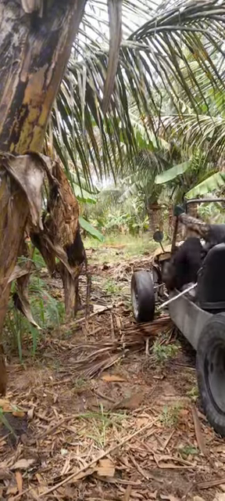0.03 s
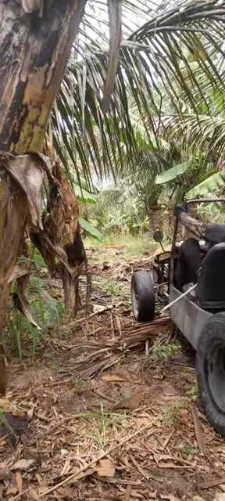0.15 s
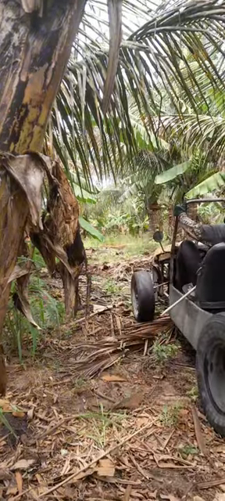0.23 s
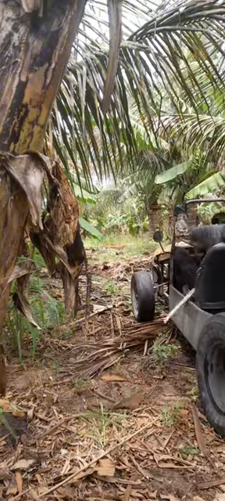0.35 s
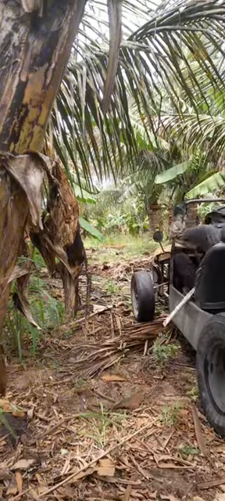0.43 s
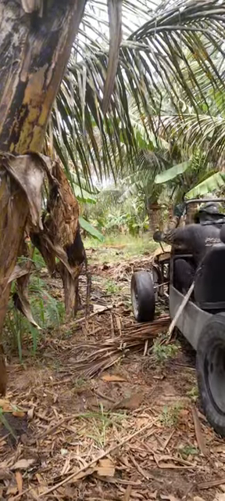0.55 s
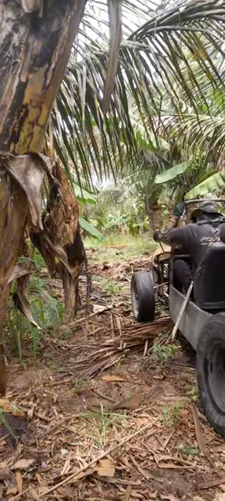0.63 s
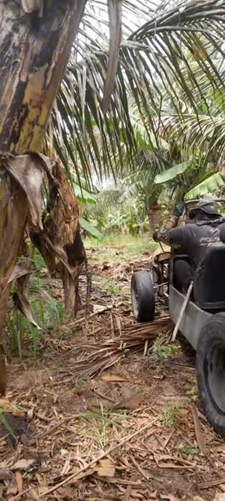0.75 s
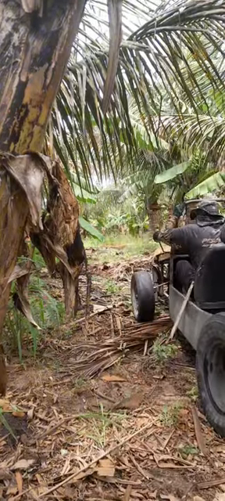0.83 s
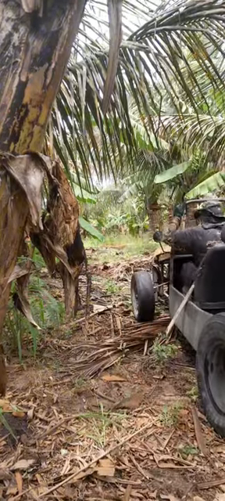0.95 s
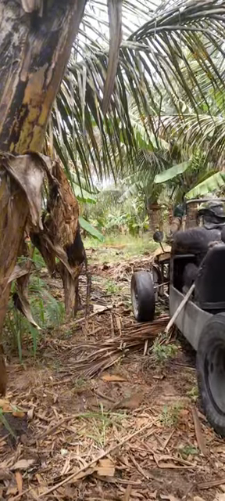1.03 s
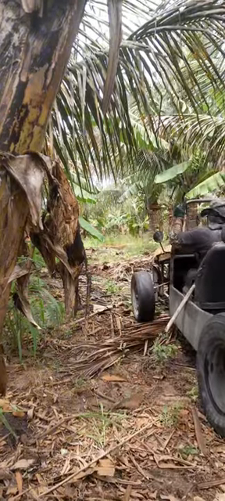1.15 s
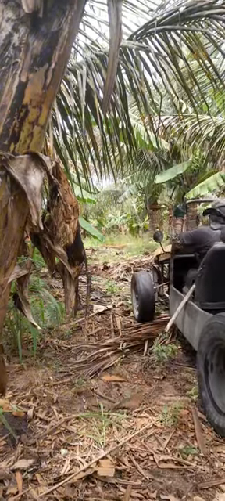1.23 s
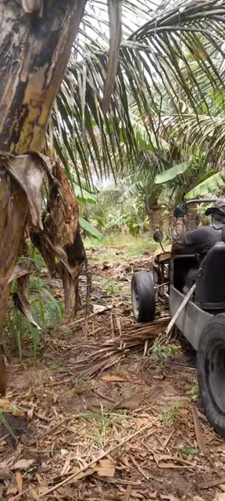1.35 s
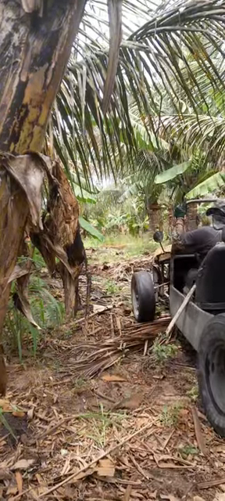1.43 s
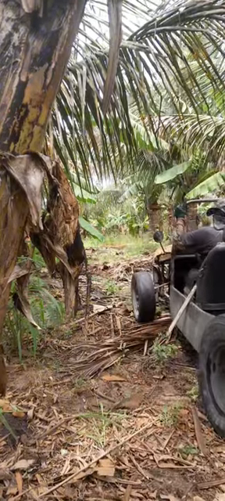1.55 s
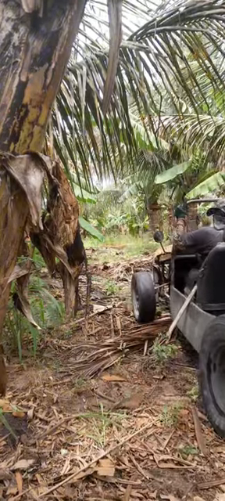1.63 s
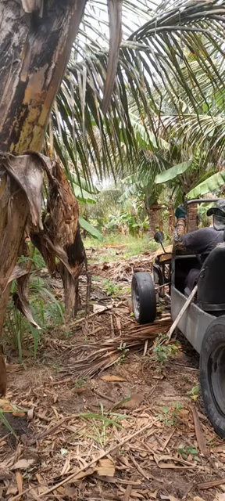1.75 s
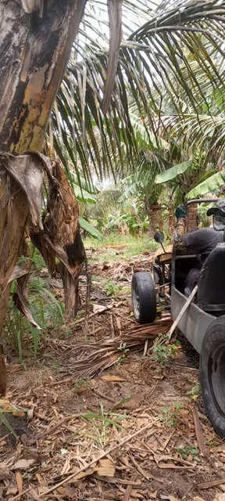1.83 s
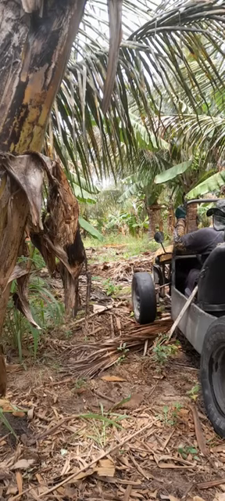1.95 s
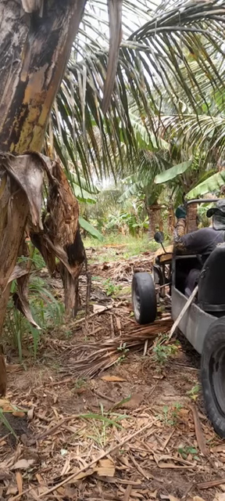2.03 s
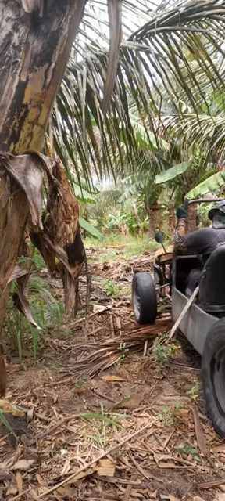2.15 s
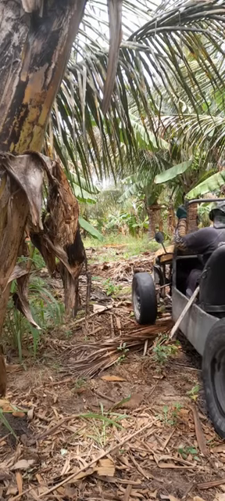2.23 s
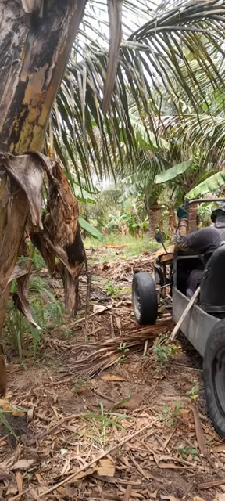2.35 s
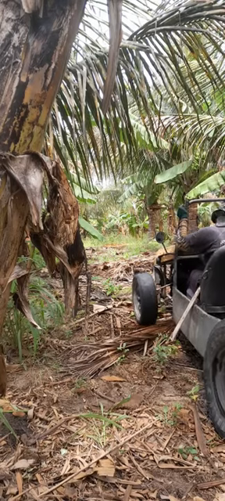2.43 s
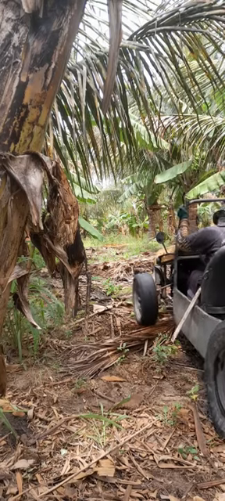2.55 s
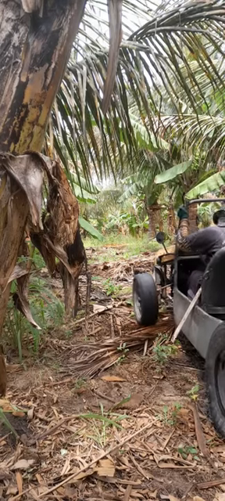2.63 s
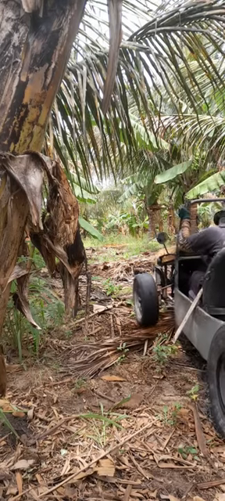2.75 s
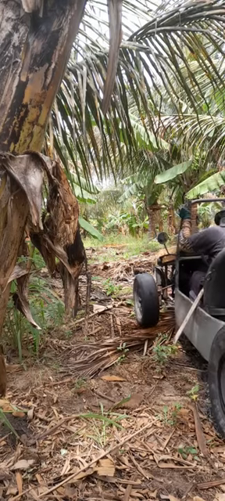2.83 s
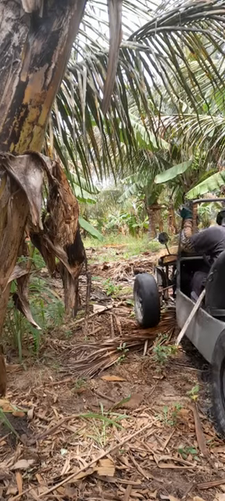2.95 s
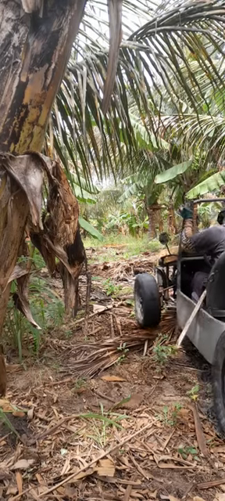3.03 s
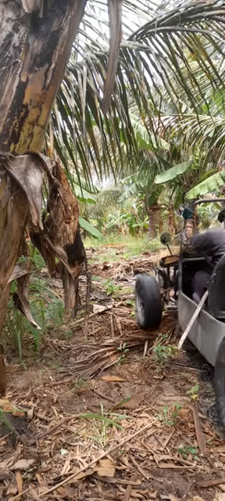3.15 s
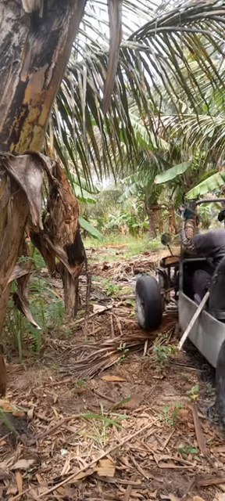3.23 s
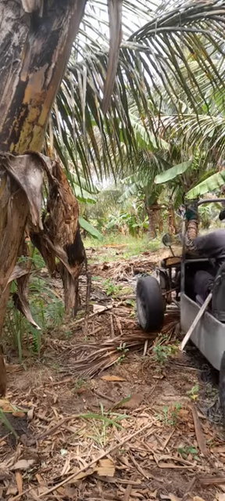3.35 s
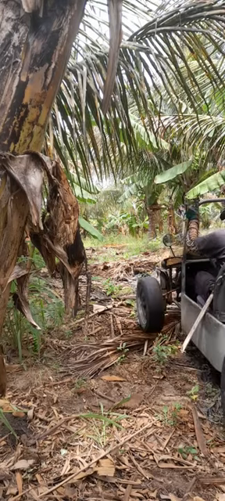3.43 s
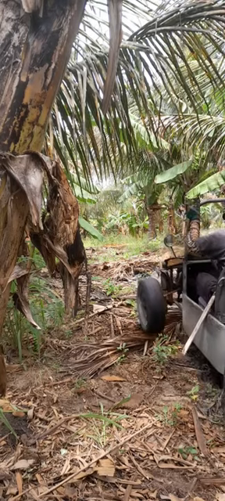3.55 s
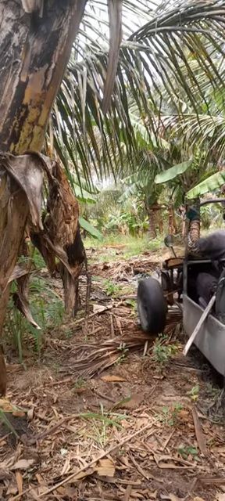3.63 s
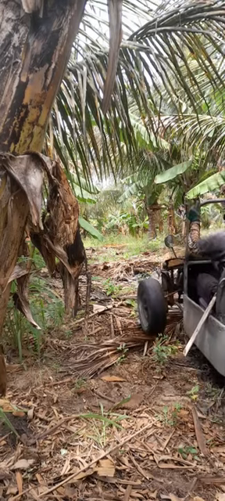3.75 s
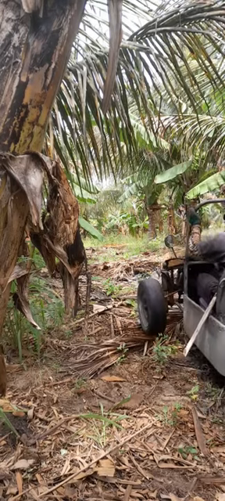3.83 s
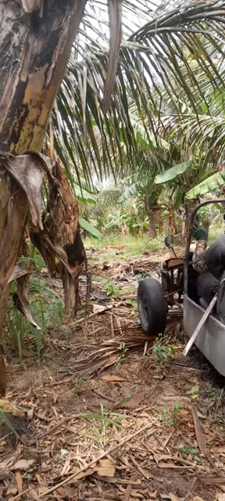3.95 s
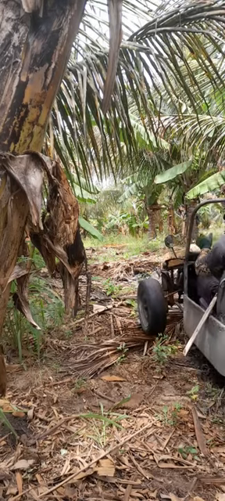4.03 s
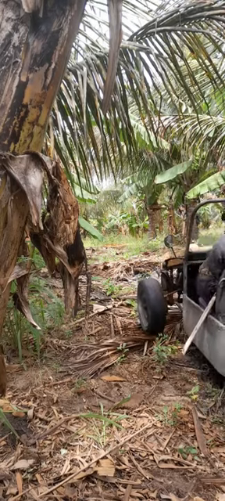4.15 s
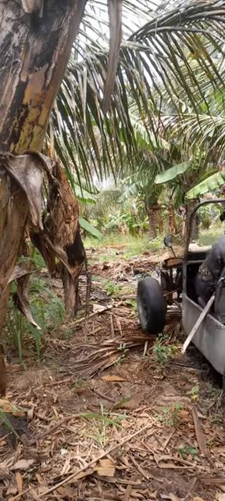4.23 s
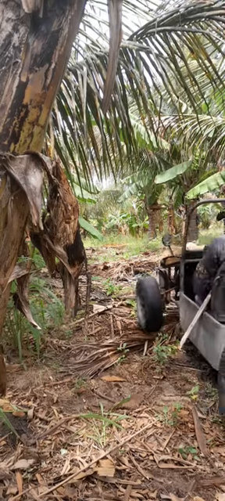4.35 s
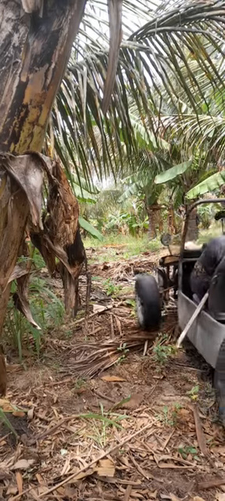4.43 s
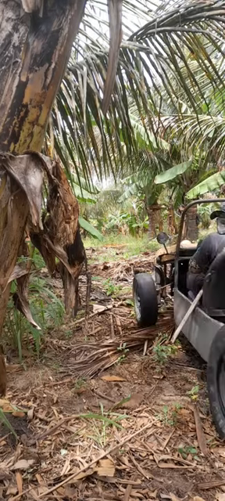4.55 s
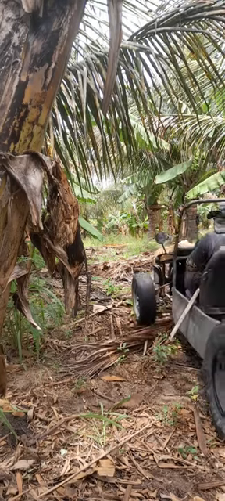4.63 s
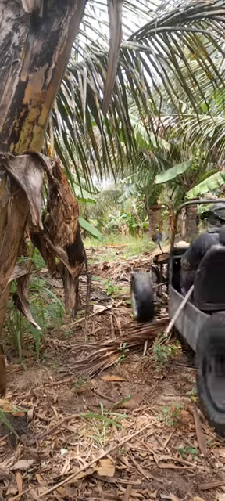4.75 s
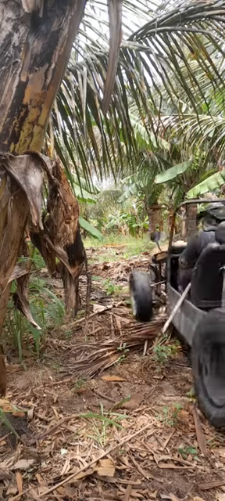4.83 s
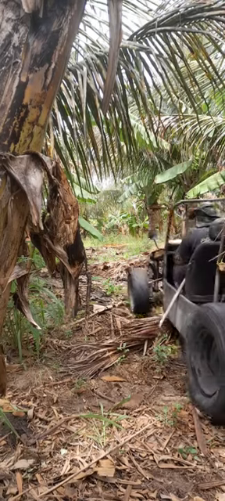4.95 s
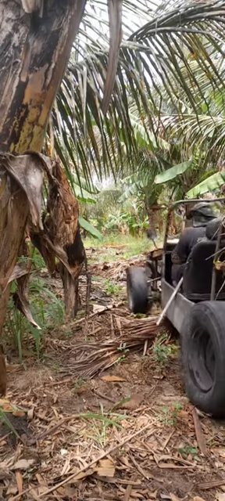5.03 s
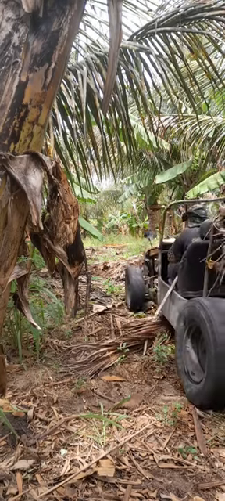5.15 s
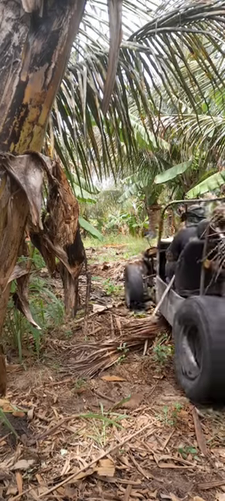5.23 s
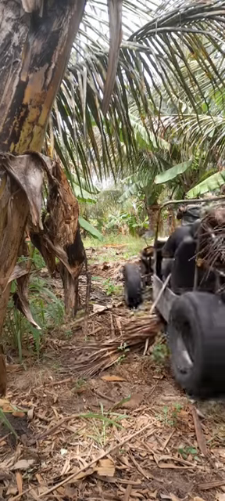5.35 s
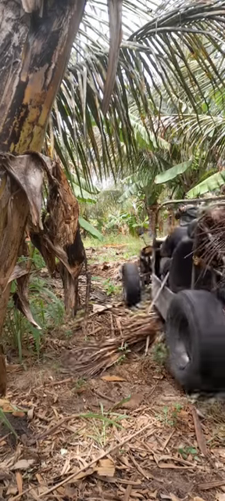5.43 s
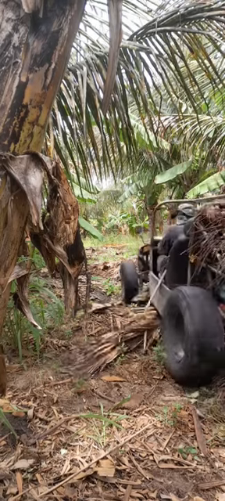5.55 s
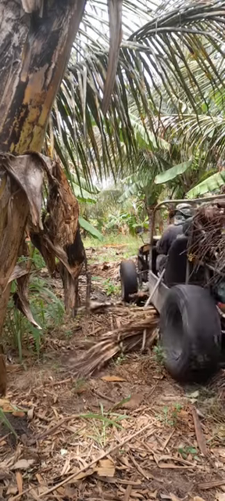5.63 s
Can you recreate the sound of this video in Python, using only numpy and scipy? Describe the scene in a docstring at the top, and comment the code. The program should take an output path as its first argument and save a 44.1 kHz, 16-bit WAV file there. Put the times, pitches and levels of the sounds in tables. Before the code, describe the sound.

The sound opens on quiet open air in a palm grove, with insects and a motor droning far off. Dry leaves crackle faintly during the first second and a half. Close to the microphone, a small buggy gives a few soft, hollow knocks around 0.5 seconds. At about 1.2 seconds its starter engages with metallic clunks and grinds louder, squealing briefly near 1.6 seconds. From 1.8 to 2.6 seconds the engine coughs in three bursts, then catches with a quick rise in speed. It sags, with one backfire pop at about 3 seconds, and stumbles near 3.5. A longer rev builds from 3.8 seconds and peaks around 4.2, full of thumping exhaust, sharp cracks and tinny rattle. The engine then slows, dropping to a lumpy idle from about 5 seconds until the end, just before 6 seconds.

```python
"""Dry leaves rustle in the open air of a palm grove, with insects and a motor far off. Close to the
microphone a small four-cylinder buggy knocks, then its starter clunks in and grinds. The engine coughs
in three bursts, catches, sags with one backfire, revs and drops to a lumpy idle. Each firing is a crack
of gas, a low thump and a ring that rises as the piston shrinks the cylinder."""
import sys
import numpy as np
from scipy import signal
from scipy.fft import rfft, irfft
from scipy.io import wavfile

SR = 44100
rng = np.random.default_rng(int(sys.argv[2]) if len(sys.argv) > 2 else 0)


def log_audio(samples):
    """Write samples as a 16-bit WAV file to the path given in sys.argv[1]."""
    # one column per channel
    frames = np.atleast_2d(samples).T
    # limit to full scale, then quantise
    limited = np.clip(frames, -1, 1)
    pcm = np.round(limited * 32767).astype(np.int16)
    wavfile.write(sys.argv[1], SR, pcm)


N = 251370
T = np.arange(N) / SR


def amp(db):
    """Decibels to amplitude."""
    return 10 ** (np.asarray(db) / 20)


def colour(x, points):
    """Filter by a spectrum of (f/Hz, gain/dB) points."""
    hz, db = np.transpose(points)
    f = np.maximum(np.fft.rfftfreq(N, 1 / SR), 1)
    return irfft(rfft(x) * amp(np.interp(np.log(f), np.log(hz), db)), N)


def noise(points, alike):
    """Coloured stereo noise at rms 1; alike is the share of power common to both channels."""
    white = np.sqrt(alike) * rng.standard_normal(N) + np.sqrt(1 - alike) * rng.standard_normal((2, N))
    coloured = colour(white, points)
    return coloured / np.sqrt(np.mean(coloured ** 2))


def walk(rate):
    """Random wander through rate points a second, spread near 1."""
    count = int(N / SR * rate) + 2
    return 1.04 * np.interp(T * rate, np.arange(count), rng.standard_normal(count))


def add(track, start, sound):
    """Mix a sound in at start seconds."""
    i = int(np.clip(start * SR, 0, N))
    track[i:i + len(sound)] += sound[:N - i]


def bursts(times, dbs, rise, decay, tail_db, tail):
    """Envelope of bursts that swell, die fast and leave a weak scatter from ground and trunks."""
    power, age = np.zeros(N), T[:SR // 3]
    swell, after = np.minimum(age / rise, 1) ** 2, np.maximum(age - rise, 0)
    scatter = amp(tail_db) ** 2 * np.exp(-2 * after / tail)
    for start, db, fade in zip(times, dbs, np.broadcast_to(decay, len(times))):
        add(power, start, amp(db) ** 2 * swell * (np.exp(-2 * after / fade) + scatter))
    return np.sqrt(power)


def resonate(x, modes):
    """Let a sound excite (f/Hz, width/Hz, gain/dB) resonances."""
    f = np.fft.rfftfreq(N, 1 / SR)
    return irfft(rfft(x) * sum(amp(db) / (1 + 2j * (f - hz) / width) for hz, width, db in modes), N)


# open air all round the microphone (f/Hz, gain/dB)
AIR_COLOUR = [(21, -37), (35, -14), (65, -15.5), (86, -10.5), (180, -8.5), (210, -10.5), (294, -13),
              (602, -15.5), (739, -10.5), (930, -15), (1480, -20.5), (2400, -24), (3350, -18),
              (5050, -34.5), (16000, -47)]
# a motor far off (f/Hz, level/dB)
MOTOR_HUM = [(59.2, -49.5), (118.4, -53.5)]
# machinery and insects in the distance (f/Hz, width/Hz, level/dB)
DRONES = [(289, 39, -56), (777, 80, -54.5), (3460, 50, -60.5), (3640, 140, -65.5), (4000, 60, -64)]
def grove(air_db=-48):
    """Steady air under the palms, with a wavering hum and narrow bands of drone."""
    air = amp(air_db) * noise(AIR_COLOUR, alike=0.65) * amp(0.13 * walk(14.6))
    hum = sum(amp(db + 2.2 * walk(5.2)) * np.sqrt(2) * np.sin(2 * np.pi * hz * T + 0.57 * walk(16))
              for hz, db in MOTOR_HUM)
    drones = sum(amp(db) * np.real((walk(width) + 1j * walk(width)) * np.exp(2j * np.pi * hz * T))
                 for hz, width, db in DRONES)
    return air + hum + drones


# the loudest crackles on the grove floor (t/s, relative level/dB)
CRACKLES = [(.076, -51), (0.186, -45), (.23, -49), (.608, -49), (1.067, -49), (1.111, -45.5),
            (1.225, -45.5)]
# dry leaves, spread wide across the microphone (f/Hz, gain/dB)
LEAF_COLOUR = [(1180, -46), (2000, -10), (2300, -4.5), (3550, -1), (8780, -12.5), (13100, -4.5),
               (16000, -13)]
def leaves(spells_s=((0, 0.31), (0.881, 1.4)), per_spell=4):
    """Leaf litter crackles: a few loud ones, and faint ones scattered through two spells."""
    faint = [(start + (end - start) * (k + rng.random()) / per_spell, -53 + rng.standard_normal())
             for start, end in spells_s for k in range(per_spell)]
    when, db = np.transpose(list(CRACKLES) + faint)
    rustle = bursts(when, db, rise=0.0013, decay=0.0085, tail_db=-2, tail=0.037)
    return noise(LEAF_COLOUR, alike=0.056) * rustle * amp(4.5 + 2.4 * walk(700))


# the buggy's frame, close by and centred (t/s, f/Hz, level/dB, length/s)
FRAME_BOOMS = [(.16, 108, -39, 0.1), (0.452, 230, -38, 0.052), (0.531, 229, -42, 0.072),
               (1.169, 118, -34.5, 0.058)]
def booms(crank_start_s=1.235, crank_period_s=.132):
    """The frame booms hollowly, and so do the starter's first four slow compression strokes."""
    compressions = [(crank_start_s + k * crank_period_s, 98, -32, .085) for k in range(4)]
    return sum(amp(db) * np.sin(2 * np.pi * hz * (T - start))
               * np.sin(np.pi * np.clip((T - start) / length, 0, 1))
               for start, hz, db, length in list(FRAME_BOOMS) + compressions)


# controls, starter and frame at close range (t/s, relative body/dB, snap/dB, body decay/s)
KNOCKS = [(0.438, -34.5, -44, 0.021), (.51, -43.5, -50, 0.017), (1.238, -28.5, -36.5, 0.029),
          (1.324, -51.5, -31, 0.0066), (1.341, -29.5, -22, 0.018), (1.364, -26.5, -52, 0.053),
          (1.438, -44, -32, 0.035), (1.701, -26, -28, 0.054), (1.74, -46, -36, 0.083),
          (1.826, -39, -32, 0.067)]
# a knock's body, near centre (f/Hz, gain/dB)
BODY_COLOUR = [(110, -5), (180, 4.5), (259, -11.5), (507, -6.5), (903, -6), (1160, -8), (1410, -17),
               (1570, -28), (2700, -32), (3000, -12), (3900, -45), (6600, -120)]
# its metallic snap, spread wider (f/Hz, gain/dB)
SNAP_COLOUR = [(470, -30), (800, -11), (1440, -7), (2050, -4), (2840, -8.5), (3740, -5.5), (8550, -29.5),
               (14800, -22.5), (16000, -30)]
# resonances of the starter housing and frame (f/Hz, width/Hz, gain/dB)
HOUSING_MODES = [(376, 20, 4.5), (456, 30, -4.5), (529, 36, 0.5), (707, 26, -6)]
def knocks():
    """Each knock is a metallic snap and a rattling body that rings the housing."""
    when, body_db, snap_db, decay = np.transpose(KNOCKS)
    body = noise(BODY_COLOUR, alike=0.97)
    body *= bursts(when, body_db, rise=0.0088, decay=decay, tail_db=-12, tail=0.15)
    snap = noise(SNAP_COLOUR, alike=.2)
    snap *= bursts(when, snap_db, rise=0.0019, decay=1.1 * decay, tail_db=-15.5, tail=0.12)
    return amp(-3.5) * body + amp(5) * resonate(body, HOUSING_MODES) + snap * amp(0.84 * walk(400))


def clatter_level(starter_in_s=1.1, peak_s=1.77, rise_db_per_s=34.5, ease_db_per_s=10):
    """The starter grinds louder as it spins up, then eases off until the engine takes over."""
    starter_db = -34 - np.maximum(rise_db_per_s * (peak_s - T), ease_db_per_s * (T - peak_s))
    running_db = effort_db(T, shut_db=-40.5, open_adds_db=5.04, octave_db=10.1)
    engaged = np.clip((T - starter_in_s) / 0.024, 0, 1)
    return amp(np.where(T < CATCH_S, starter_db, running_db)) * engaged


# gears and tappets, heard from beside the engine (f/Hz, gain/dB)
GEAR_COLOUR = [(290, -12.5), (500, -4.5), (659, -8), (1000, -1.5), (1400, -10.5), (1600, -7.5), (1820, -14),
               (2070, -9.5), (2460, -12), (3340, -7.5), (8700, -31), (13100, -21), (16000, -30.5)]
def clatter(when):
    """Gears rasp and tappets tick twice a stroke; the block knocks near 1 kHz and rumbles faintly."""
    stroke_s = np.gradient(when)
    taps = np.r_[when + .002, when + stroke_s / 2]
    tap_db = -2 + 3 * rng.standard_normal(len(taps))
    ticks = bursts(taps, tap_db, rise=0.00067, decay=0.0018, tail_db=-32, tail=.015)
    rasp = noise(GEAR_COLOUR, alike=0.46) * (amp(-0.5 + 2 * walk(250)) + ticks)
    # the knock stands out when the engine runs slowly
    knock_db = 1 + 20 * np.log10(np.minimum(stroke_s / 0.019, 1.2)) + 3 * rng.standard_normal(len(when))
    beats = bursts(when - .002, knock_db, rise=0.0044, decay=0.0045, tail_db=-27, tail=0.021)
    knock = noise([(700, -10), (900, -1), (1020, 6), (1200, -6), (1400, -48)], alike=0.99) * beats
    rumble = noise([(40, -23), (110, -7.5), (420, -10.5), (650, -23), (1200, -61)], alike=0.91)
    return clatter_level() * (rasp + knock + amp(-0.5) * rumble)


# the starter drive, close by (harmonic number, relative level/dB)
SQUEAL_PARTIALS = [(1, -3.5), (2, -12), (3, -7), (4, 2.5), (5, -15)]
def squeal(start_s=1.612, length_s=0.059, hz=1035, sag=0.036):
    """The starter drive squeals briefly and roughly, sagging under load."""
    progress = np.clip((T - start_s) / length_s, 0, 1)
    phase = 2 * np.pi * np.cumsum(hz * (1 - sag * progress + 0.0092 * walk(1000))) / SR
    partials = sum(amp(db + 2.2 * walk(400)) * np.sin(k * phase + 0.22 * walk(500))
                   for k, db in SQUEAL_PARTIALS)
    hiss = amp(-6) * noise(SNAP_COLOUR, alike=0.17)
    return amp(-27) * np.sin(np.pi * progress) * (partials + hiss)


# strokes that fire while the engine is still cranking (t/s, relative thump/dB, relative crack/dB)
COUGHS = [(1.794, -10, -14.5), (1.859, -9, -11.5), (1.910, -9, -17.5), (1.952, -8.5, -16.5),
          (2.14, -12.5, -20.5), (2.182, -10.5, -13), (2.225, -9, -11.5), (2.273, -11, -27.5),
          (2.525, -11.5, -18), (2.568, -7.5, -12.5), (2.611, -6.5, -12.5)]
def cranking(dead_stroke_s=.048, lead_s=0.0103, dead_thump_db=-17.5, dead_crack_db=-41):
    """Time, thump and crack of the coughs and the slowing dead strokes that coast between them."""
    strokes = [COUGHS[0]]
    for last, cough in zip(COUGHS, COUGHS[1:]):
        gap = cough[0] - last[0]
        for share in np.linspace(0, 1, int(round(gap / dead_stroke_s)) + 1)[1:-1]:
            start = last[0] + share * gap - lead_s * np.sin(np.pi * share)
            strokes.append((start, dead_thump_db, dead_crack_db))
        strokes.append(cough)
    return np.transpose(strokes)


# a blip as it catches, a coast, a longer rev, then a light pull (t/s, throttle/0-1)
THROTTLE = [(2.65, 0.96), (2.83, .9), (2.9, 0.18), (3.1, 0.1), (3.56, 0.26), (3.82, 0.89), (4.2, 0.76),
            (4.56, 0.82), (4.85, 0.47), (5.7, 0.69)]
def effort_db(t, shut_db, open_adds_db, octave_db, mid_speed_hz=42):
    """Level of an engine layer from the throttle and the octaves above mid speed."""
    throttle = np.interp(t, *np.transpose(THROTTLE))
    octaves = np.log2(np.interp(t, *np.transpose(FIRING_RATE)) / mid_speed_hz)
    return shut_db + open_adds_db * throttle + octave_db * octaves


# engine speed once it has caught (t/s, firing rate/Hz)
FIRING_RATE = [(2.647, 33.08), (2.8, 55.927), (2.95, 55.507), (3.106, 47.271), (3.347, 41.382),
               (3.456, 44.839), (3.523, 32.004), (3.771, 39.922), (3.962, 59.271), (4.117, 63.863),
               (4.295, 64.098), (4.68, 51.847), (4.886, 39.588), (5.229, 28.552), (5.413, 25.932),
               (5.7, 29.243)]
CATCH_S = FIRING_RATE[0][0]
# cylinder offsets in firing order (thump/dB, crack/dB, early ring/dB, late ring/dB, lateness/strokes)
CYLINDERS = [(-5, -7.5, 3, 3.5, 0.0113), (4, -4, -26, -15, 0.0078), (-4, 3.5, -12, 0.5, -0.0442),
             (-1, 1.5, -14.5, -12.5, -0.0185)]
def firings():
    """Time and levels of every stroke, cranking and then running; unequal cylinders make it lumpy."""
    running = T >= CATCH_S
    strokes = np.cumsum(np.interp(T, *np.transpose(FIRING_RATE)) * running) / SR
    count = np.arange(int(strokes[-1]) + 1)
    crank_s, crank_thump_db, crank_crack_db = cranking()
    cranked = len(crank_s)
    cylinder = np.arange(-cranked, len(count)) % len(CYLINDERS)
    thump, crack, early, late, lateness = np.array(CYLINDERS)[cylinder].T
    when = np.interp(count + lateness[cranked:], strokes[running], T[running])
    push_luck, crack_luck = rng.standard_normal((len(count), 2)).T
    run_push_db = effort_db(when, shut_db=-17.5, open_adds_db=8.43, octave_db=6.5) + push_luck
    run_crack_db = effort_db(when, shut_db=-41, open_adds_db=27.97, octave_db=-0.4) + 1.1 * crack_luck
    push_db = np.r_[crank_thump_db, run_push_db]
    crack_db = np.r_[crank_crack_db, run_crack_db + crack[cranked:]]
    return np.r_[crank_s, when], push_db + thump, push_db + early, push_db + late, crack_db


# gas ringing in a cylinder as the piston rises (age/strokes, f/Hz, relative level/dB)
CYLINDER_RING = [(0, 100, -12.5), (.3, 110, 1.5), (.7, 135, -6.5), (1.1, 205, -8), (1.35, 287.3, -19),
                 (1.6, 401, -14.5), (1.85, 535, -21.5), (2.2, 683, -60)]
# the small silencer sends little deep bass to the microphone (f/Hz, gain/dB)
SILENCER_COLOUR = [(22, -32), (35, -26), (48, -10), (62, -8), (85, -1), (120, 0), (600, -2)]
def exhaust(when, thump_db, early_db, late_db, thump_hz=80, thump_s=0.0065, lag_s=.0105):
    """Each blow-down thumps the silencer; the cylinder rings like a bottle that is being filled."""
    out, age = np.zeros(N), T[:SR // 7]
    ring_age, ring_hz, ring_db = np.transpose(CYLINDER_RING)
    thump_shape = np.exp(-((age - lag_s - .002) / thump_s) ** 2) * np.minimum(age / 0.0018, 1)
    thump = -np.cos(2 * np.pi * thump_hz * (age - lag_s)) * thump_shape
    for start, stroke_s, low, early, late in zip(when, np.gradient(when), thump_db, early_db, late_db):
        strokes = age / stroke_s
        # the pitch varies from firing to firing, less so at speed
        detune = 1.31 * stroke_s * rng.standard_normal() * np.minimum(age / 0.042, 1)
        turns = np.cumsum(np.interp(strokes, ring_age, ring_hz) * (1 + detune)) / SR
        tone = -np.cos(2 * np.pi * (turns - np.interp(lag_s, age, turns)))
        # one cylinder rings freely from the start; its opposite comes through only late in the stroke
        late_share = np.clip((strokes - .85) / 0.21, 0, 1)
        strength_db = early + (late - early + 3 * rng.standard_normal()) * late_share
        gate = np.minimum(age / 0.0057, 1) * (strokes < ring_age[-1])
        ring = amp(strength_db + np.interp(strokes, ring_age, ring_db)) * gate * tone
        add(out, start, amp(low + 1) * thump + ring)
    return colour(out, SILENCER_COLOUR)


# the exhaust reaching the microphone off ground and bodywork (delay/s, gain/dB)
ECHOES = [(.0047, -12), (0.0111, -4), (0.0195, -12.5)]
def reflect(x):
    """Nearby surfaces throw back all but the bass, which hollows the rising ring."""
    upper = colour(x, [(120, -28), (190, -3), (260, -6.5), (900, -6.5)])
    return x + sum(amp(db) * np.interp(T - delay, T, upper, left=0) for delay, db in ECHOES)


# escaping gas, close to the microphone (f/Hz, gain/dB)
GAS_COLOUR = [(350, -25), (600, -36), (670, -6.5), (997, -9), (1240, -4), (1370, -11.5), (1640, -1.5),
              (2470, -5), (3210, -7.5), (3480, -7), (4400, 1), (6290, -9.5), (8740, -15.5), (14100, -1.5),
              (16000, -11)]
# resonances of the header pipes and engine tin (f/Hz, width/Hz, gain/dB)
TIN_MODES = [(960, 230, -16), (1185, 130, -5), (1605, 170, -13), (1770, 87, -11), (1995, 110, -18),
             (2420, 85, -13.5), (3255, 270, -2), (3706, 190, -10.5), (3770, 34, -8.5), (4276, 140, -17.5)]
def cracks(when, crack_db, lead_s=0.002483, chuff_hz=950):
    """Gas tears out of a leaky joint and rings the tin, with a short rising chuff of the header pipe."""
    when = when - lead_s
    envelope = bursts(when, crack_db, rise=0.0043, decay=0.0099, tail_db=-11, tail=0.039)
    envelope *= amp(0.61 * walk(900))
    gas = noise(GAS_COLOUR, alike=0.12) * envelope
    tin = resonate(noise([(500, 1), (6000, 7.5), (9000, -22)], alike=0.13) * envelope, TIN_MODES)
    chuff, age = np.zeros(N), T[:SR // 40]
    shape = np.exp(-((age - .006) / 0.002) ** 2)
    for start, db in zip(when, crack_db):
        hz = chuff_hz * amp(0.86 * rng.standard_normal()) * (1 + age / 0.035)
        add(chuff, start - .001, amp(db - 4) * np.sin(2 * np.pi * np.cumsum(hz) / SR) * shape)
    return amp(-1) * (gas + tin) + chuff


def barks(when, bark_db, decay_s=0.006):
    """Each cylinder's blow-down runs down its own pipe and rattles it the same way every time."""
    out, age = np.zeros((2, N)), T[:SR // 25]
    shape = np.minimum(age / 0.0043, 1) ** 2 * np.exp(-np.maximum(age - .005, 0) / decay_s)
    pipe_colour = [(450, -24), (780, 2.5), (1150, 7), (1400, 3), (1750, 2.5), (4500, 0), (7000, -54)]
    pipes = np.array_split(noise(pipe_colour, alike=0.56), len(CYLINDERS), axis=1)
    for k, (start, gain) in enumerate(zip(when, amp(bark_db))):
        for channel, rattle in zip(out, pipes[k % len(CYLINDERS)]):
            add(channel, start, gain * shape * rattle[:len(age)])
    return out


def pings(when, crack_db, spread_db=3.3, detune=.05, rise_s=0.0042, decay_s=0.0073):
    """Each firing jolts the loose tin differently, so one or two of its modes stand out."""
    out, age = np.zeros((2, N)), T[:SR // 20]
    hz, _, mode_db = np.transpose(TIN_MODES)
    shape = np.minimum(age / rise_s, 1) * np.exp(-age / decay_s)
    for start, db in zip(when, crack_db):
        pitch, size, left_phase, right_phase = rng.standard_normal((4, len(TIN_MODES)))
        turns = np.outer(hz * (1 + detune * pitch), age)
        gains = amp(db - 2.5 + mode_db + spread_db * size)
        for channel, phase in zip(out, (left_phase, right_phase)):
            add(channel, start, shape * (gains @ np.sin(2 * np.pi * turns + phase[:, None])))
    return out


# the engine's balance at the microphone (f/Hz, left minus right/dB)
BODYWORK_SHADE = [(200, 0.5), (380, 1.5), (700, 2), (1290, 2), (2380, -2), (4400, -5.5), (8100, 17),
                  (12000, 1)]
def shade(engine):
    """The bodywork shades each side differently."""
    return np.array([colour(channel, [(hz, side * db / 2) for hz, db in BODYWORK_SHADE])
                     for channel, side in zip(engine, (1, -1))])


# a pop from the tailpipe, close by (f/Hz, gain/dB)
BACKFIRE_COLOUR = [(350, -33), (600, -2), (1180, 2), (1490, -12), (2370, -6), (2870, -23), (3300, -5.5),
                   (7310, -24.5), (8990, -28), (14700, -23), (16000, -30)]
def backfire(start_s=3.0205, db=-10):
    """Unburnt fuel pops once in the exhaust, off throttle."""
    envelope = bursts([start_s], [db], rise=0.0017, decay=0.0083, tail_db=-10, tail=0.018)
    return noise(BACKFIRE_COLOUR, alike=0.26) * envelope


def scene():
    """The buggy close in front of a stereo microphone, the grove all round."""
    when, thump_db, early_db, late_db, crack_db = firings()
    engine = reflect(exhaust(when, thump_db, early_db, late_db)) + cracks(when, crack_db)
    engine += barks(when - .003, crack_db - 6) + pings(when, crack_db) + clatter(when)
    return shade(engine) + backfire() + squeal() + knocks() + booms() + grove() + leaves()


def record(dry):
    """The microphone drops the deepest bass, clips at full scale and cuts the top."""
    low_cut = signal.butter(1, 15, "high", fs=SR, output="sos")
    top_cut = signal.ellip(10, .2, 80, 15900, fs=SR, output="sos")
    return signal.sosfilt(top_cut, np.clip(signal.sosfilt(low_cut, dry), -1, 1))


dry = scene()
out = record(dry)
log_audio(out)
```